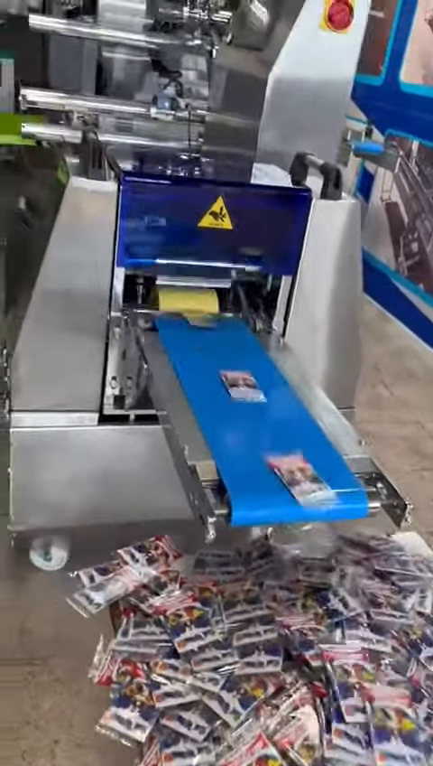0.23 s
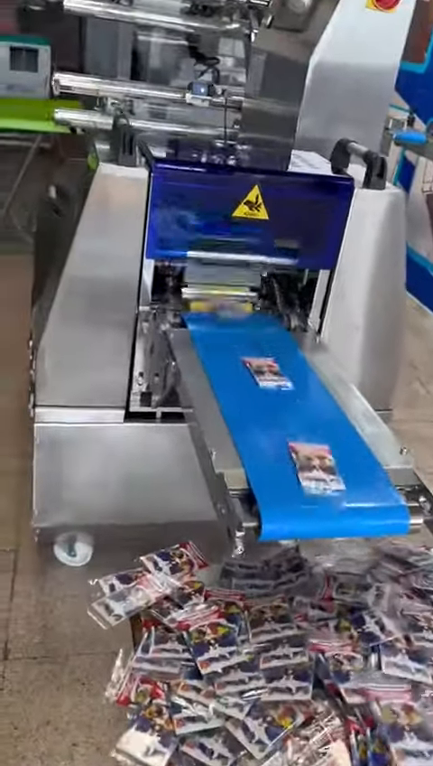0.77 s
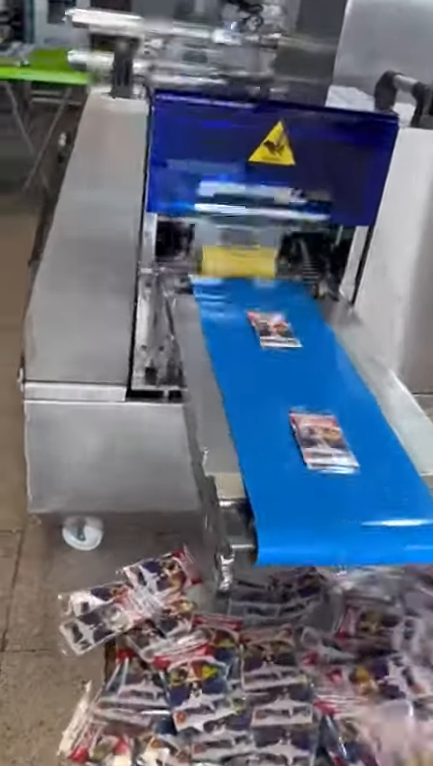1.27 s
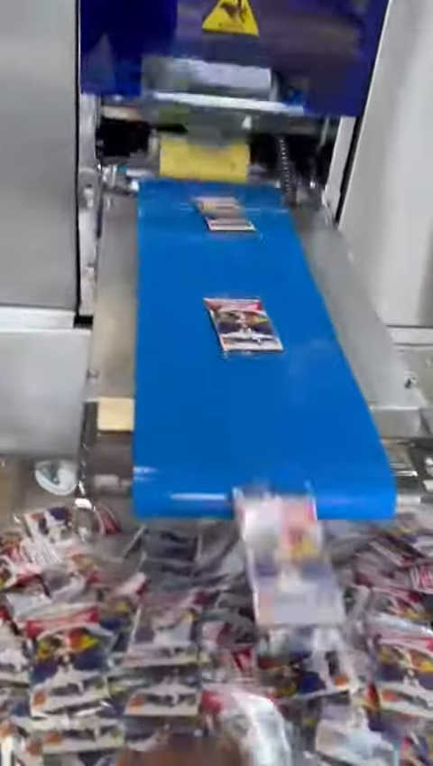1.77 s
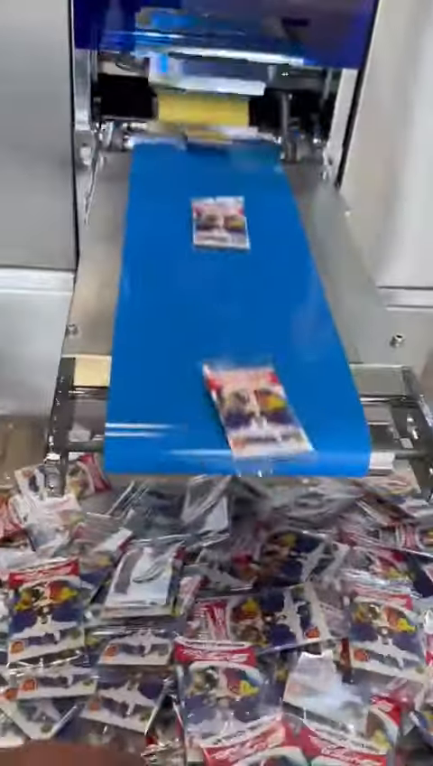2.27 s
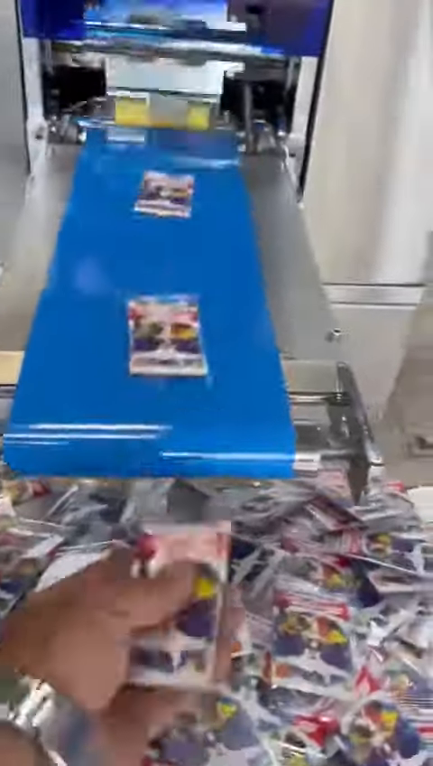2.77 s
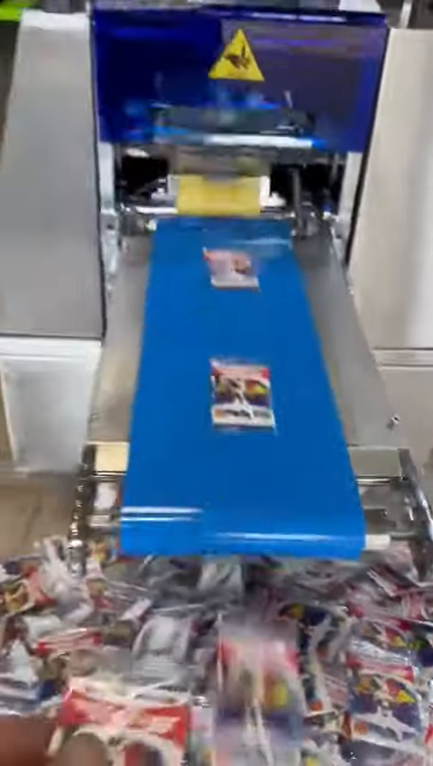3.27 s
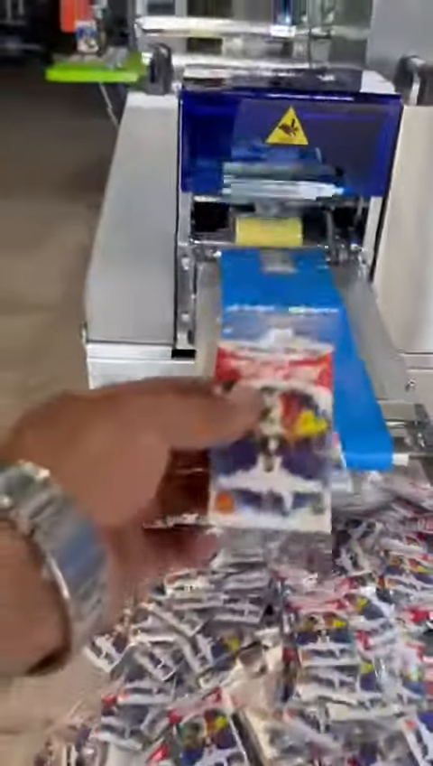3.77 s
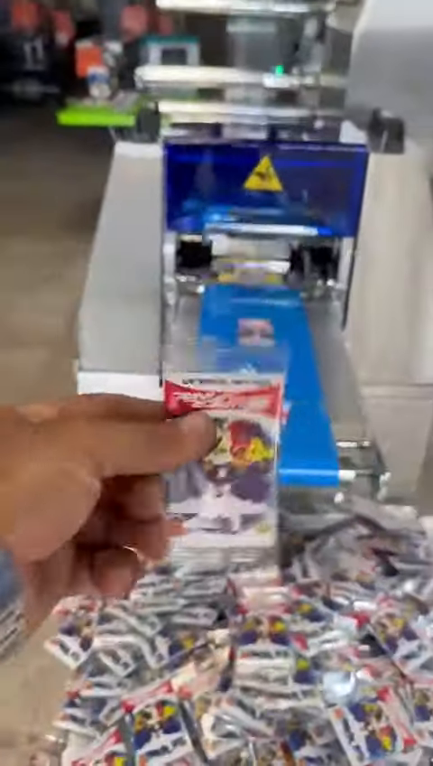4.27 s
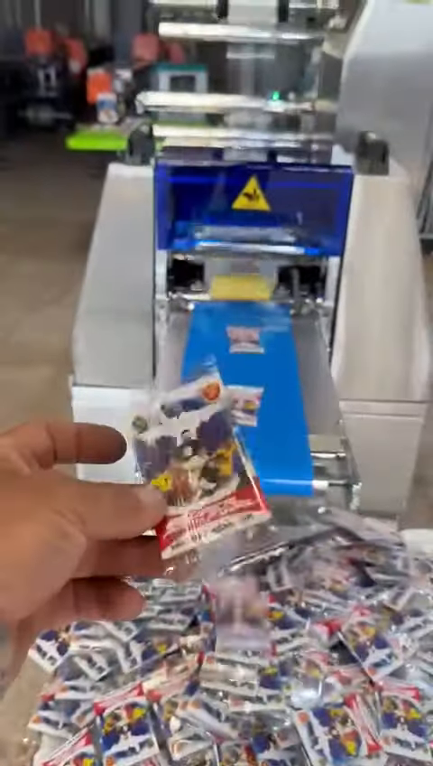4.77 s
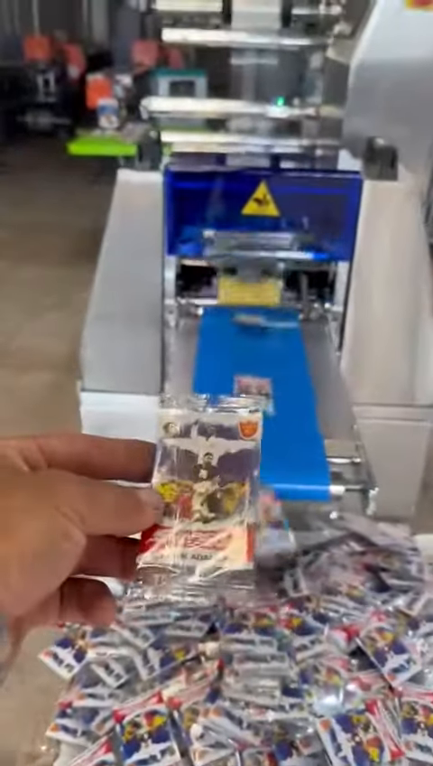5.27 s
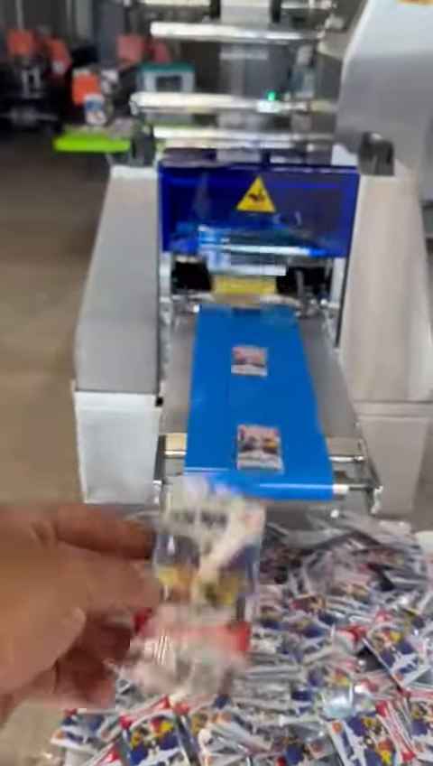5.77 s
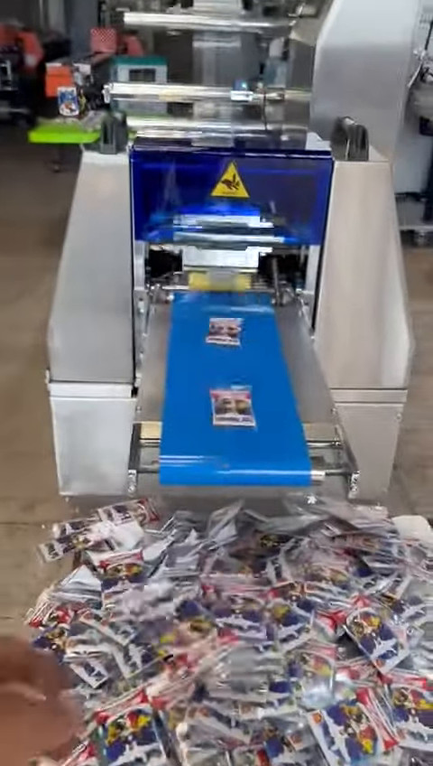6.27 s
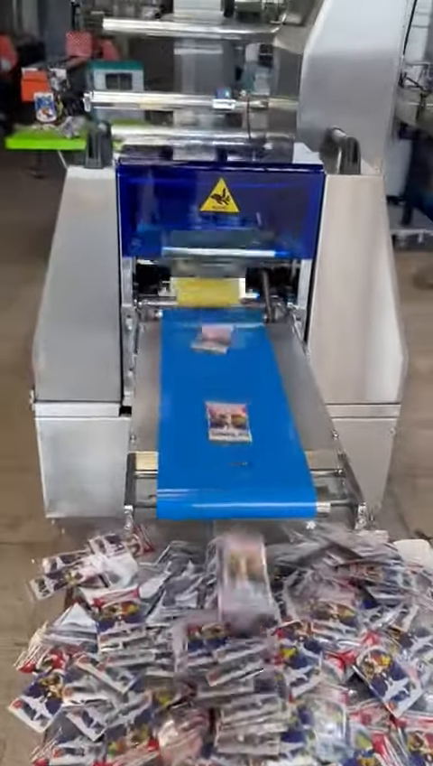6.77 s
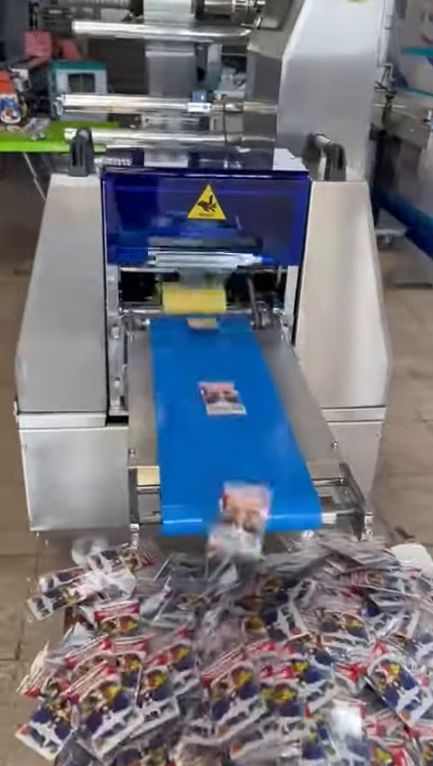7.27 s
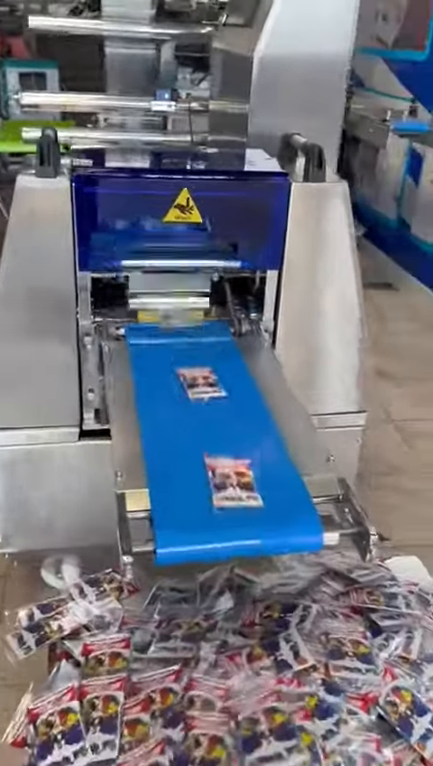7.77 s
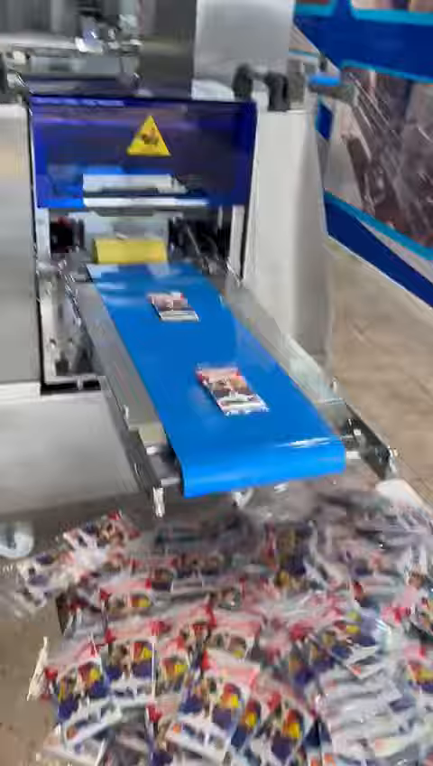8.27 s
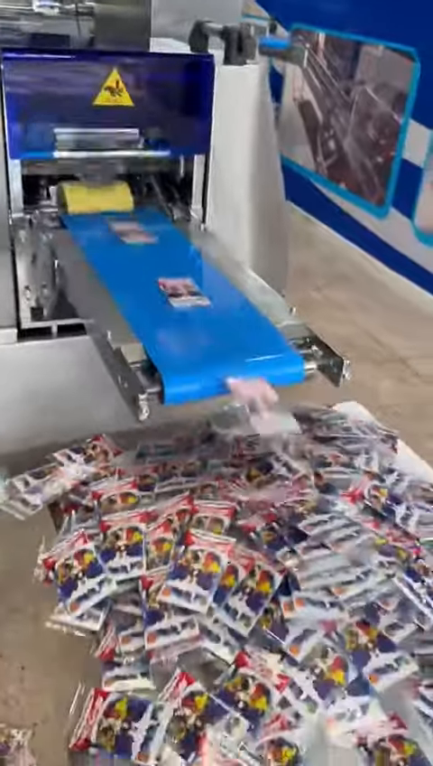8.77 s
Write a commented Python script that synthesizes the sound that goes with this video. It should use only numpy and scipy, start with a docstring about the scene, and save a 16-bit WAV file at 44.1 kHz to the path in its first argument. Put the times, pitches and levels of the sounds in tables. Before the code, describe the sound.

A packaging machine runs with a rhythmic groan, knock and steel clack over a steady hiss, while foil packets crinkle close by.

```python
"""A rhythmic groan, knock and clack over a steady hiss: a flow-wrap packaging machine in a workshop.
In every cycle the drive groans and hums under a changing load, the cams knock, and the sealing jaws
twice snap through the film and clack open. The steel cabinet rumbles; chain, belt and film hiss.
Foil packets drop on a heap and crinkle in a hand. All is heard close up, on a hand-held microphone."""
import sys
import numpy as np
from scipy import signal
from scipy.fft import rfft, irfft, next_fast_len
from scipy.io import wavfile
from scipy.ndimage import uniform_filter1d

SR = 44100
rng = np.random.default_rng(int(sys.argv[2]) if len(sys.argv) > 2 else 0)


def dump_mix(stems):
    """Bounce the given channels to the path in sys.argv[1] as a 16-bit WAV at rate SR."""
    frames = np.atleast_2d(stems).T  # one column per channel
    limited = np.clip(frames, -1, 1)  # hard clip at full scale
    pcm = np.round(limited * 32767).astype(np.int16)
    wavfile.write(sys.argv[1], SR, pcm)


N = 398223
TIME = np.arange(N) / SR
PADDED = next_fast_len(N, real=True)
BINS_HZ = np.fft.rfftfreq(PADDED, 1 / SR)
CYCLE_S = .5835
STROKE_S = CYCLE_S / 2  # the jaws close twice a cycle

# The microphone leans in and out: time_s, nearness_db, handling_rumble_db
MIC_MOVES = [(0, 0, -57.5), (1.2, 0, -55.5), (2, 1.5, -39.5), (2.8, -0.5, -50), (3.5, 0.5, -52),
             (4.4, -0.9, -40), (5.5, -0.5, -50), (6.2, 0, -57.5), (7, 0, -49), (7.8, -0.5, -38),
             (8.4, -1, -44), (9, -.5, -42)]
# The bright colour of crackling film: frequency_hz, level_db
FILM_COLOUR = [(500, -15.5), (2000, -9), (4500, 0), (6300, -1.5), (7400, -2.5), (9000, -5), (9800, -2.5),
               (10500, -20), (12000, -35)]


def amp(db):
    """Decibels to gain."""
    return 10 ** (np.asarray(db) / 20)


def unit_rms(x):
    """Scales x to rms 1."""
    return x / np.sqrt(np.mean(x ** 2) + 1e-20)


def curve_at(points, hz):
    """Reads a curve on a log-frequency axis."""
    points_hz, values = np.transpose(points)
    return np.interp(np.log(hz + 1), np.log(points_hz + 1), values)


def add(mix, start_s, sound):
    """Lays a sound into the mix at start_s."""
    part = mix[..., max(round(start_s * SR), 0):][..., :sound.shape[-1]]
    part += sound[..., :part.shape[-1]]


def filtered(x, gain):
    """Applies one gain to each frequency."""
    return irfft(rfft(x.astype(np.float32), PADDED) * gain.astype(np.float32), PADDED)[..., :N]


def coloured(x, spectrum):
    """Gives x a spectrum, at rms 1."""
    return unit_rms(filtered(x, amp(curve_at(spectrum, BINS_HZ))))


def dappled(x, spectrum, ripple_db, patchy_db):
    """Colours x, at rms 1; reflections off steel sheets ripple it and moving parts shift it in patches."""
    hz, _, frames = signal.stft(x.astype(np.float32), SR, nperseg=2048)
    ripple = unit_rms(uniform_filter1d(rng.standard_normal(len(hz)), size=3))[:, None]
    patches = uniform_filter1d(rng.standard_normal(frames.shape[1:]), size=9, axis=0)
    patches = unit_rms(uniform_filter1d(patches, size=4, axis=1))
    short_waves = np.clip(hz / 900, 0, 1)[:, None] ** 2  # long waves bend round the sheets
    gain = amp(curve_at(spectrum, hz)[:, None] + short_waves * (ripple_db * ripple + patchy_db * patches))
    _, shaped = signal.istft(frames * gain.astype(np.float32), SR, nperseg=2048)
    return unit_rms(shaped[:, :N])


def ringing(x, modes, spread):
    """Rings x through a bank of resonances, each 6 dB down at spread * width from its centre."""
    power = sum((amp(db) * unit_rms(1 / (1 + ((BINS_HZ - hz) / (spread * width)) ** 2))) ** 2
                for hz, width, db in modes)
    return filtered(x, np.sqrt(power))


def resonate(x, hz, width_hz):
    """A steep resonance that can follow a pitch curve, at rms 1."""
    carrier = np.exp(2j * np.pi * np.cumsum(hz * np.ones(N)) / SR)
    pole = np.exp(-np.pi * width_hz / SR)
    baseband = signal.lfilter([(1 - pole) ** 2], [1, -2 * pole, pole * pole], x / carrier)
    return unit_rms((carrier * baseband).real)


def tone(pitch_hz):
    """A sine that follows a pitch curve, at rms 1."""
    return unit_rms(np.sin(2 * np.pi * np.cumsum(pitch_hz) / SR))


def wander(rate_hz):
    """A smooth random drift of rms 1, up to about rate_hz changes a second."""
    t = TIME[::128]
    rolloff = np.exp(-(np.fft.rfftfreq(len(t), t[1]) / rate_hz) ** 2)
    drift = irfft(rfft(rng.standard_normal(len(t))) * rolloff, len(t))
    return np.interp(TIME, t, unit_rms(drift))


def sway(period_s, peak_s):
    """A regular swing between -1 and 1 with a crest at peak_s."""
    return np.cos(2 * np.pi * (TIME - peak_s) / period_s)


def each_cycle(first_s, uneven_db, accents=()):
    """(start_s, extra_db) of a hit that returns each cycle, a little uneven; accents set single ones."""
    starts_s = np.arange(first_s, N / SR, CYCLE_S)
    extra_db = uneven_db * rng.standard_normal(len(starts_s))
    for accent_s, accent_db in accents:
        extra_db[abs(starts_s - accent_s) < .03] = accent_db
    return zip(starts_s, extra_db)


def shaking(repeat):
    """Two channels of random force; a share returns every cycle as the same teeth meet again."""
    cycle = rng.standard_normal((2, round(CYCLE_S * SR)))
    looped = cycle[:, np.arange(N) % cycle.shape[1]]
    return np.sqrt(repeat) * looped + np.sqrt(1 - repeat) * rng.standard_normal((2, N))


def grains(per_s, spread_db=0):
    """Two channels of scattered tiny clicks; spread_db makes their sizes uneven."""
    place, sign, chance = rng.random((round(2 * per_s * N / SR), 3)).T
    size = amp(spread_db * np.minimum(-np.log(1 - chance), 4))
    clicks = np.zeros(2 * N)
    clicks[(place * 2 * N).astype(int)] = np.sign(sign - .5) * size
    return clicks.reshape(2, N)


def bursts(hits, rise_s, t60_s):
    """Envelope of hits (start_s, level_db) with a quick attack and a dying tail."""
    power, t = np.zeros(N), np.arange(SR // 2) / SR
    for start_s, db in hits:
        add(power, start_s, (amp(db - 60 * t / t60_s) * (1 - np.exp(-t / rise_s))) ** 2)
    return np.sqrt(power)


def narrow_swells(swells):
    """Brief narrow bands of noise that fade in and out."""
    out = np.zeros(N)
    for start_s, length_s, hz, width_hz, db in swells:
        size = round(length_s * SR)
        band = 1 / (1 + ((np.fft.rfftfreq(size, 1 / SR) - hz) / (width_hz / 2)) ** 2)
        ring = unit_rms(irfft(rfft(rng.standard_normal(size)) * band, size))
        add(out, start_s, amp(db) * signal.windows.tukey(size, .7) * ring)
    return out


def drive(roughness=.26, waver_hz=6, throb_db=1.6, groan_db=-3, boom_s=.0496):
    """The drive speeds up and slows each cycle; its gear tone groans in the cabinet and booms on load."""
    # The groan through one cycle: cycle_time_s, pitch_hz, level_db
    groan = [(.03, 320.4, -27.5), (.12, 322.6, -28), (.17, 333.7, -29.5), (.23, 332.5, -24),
             (.31, 323.7, -31), (.36, 309.6, -25), (.416, 315, -24), (.445, 318, -34.5),
             (.51, 336.7, -23.5)]
    # Two quick booms a cycle as the drive pulls: cycle_time_s, pitch_hz, level_db
    pulls = [(.482, 339, -24.5), (.547, 328.7, -24.5)]
    # The hardest pulls: centre_s, length_s, pitch_hz, level_db
    hard_pulls = [(0.478, 0.052, 345, -18.5), (0.537, 0.027, 326.5, -24), (0.941, 0.061, 304, -21.5),
                  (1.068, 0.026, 332, -18), (1.121, 0.048, 320.5, -21), (1.166, 0.047, 315, -20),
                  (1.403, 0.042, 325, -23), (1.452, 0.052, 310.3, -22), (1.54, 0.07, 309.8, -20.5),
                  (1.642, 0.044, 337, -22), (1.714, .05, 315, -22), (2.231, 0.023, 327.6, -12.5),
                  (2.285, 0.044, 319.2, -20), (2.818, 0.026, 344, -22.5), (3.097, 0.043, 337, -22.5),
                  (3.391, 0.043, 339.8, -18.5), (3.448, .045, 331, -20.5), (3.922, 0.047, 298.4, -18),
                  (4.033, 0.076, 334.3, -16.5), (4.283, 0.037, 307.2, -22.5), (4.634, 0.032, 327.8, -18),
                  (5.155, 0.052, 334, -17.5), (5.228, 0.04, 319.4, -17.5), (5.745, 0.11, 338, -16.5),
                  (5.809, 0.036, 334, -17.5), (6.329, 0.071, 332.7, -19), (6.396, 0.065, 327.7, -16.5),
                  (6.82, 0.033, 298.5, -20), (7.5, 0.068, 325, -21), (7.543, 0.054, 320, -20)]
    times_s, pitches_hz, levels_db = np.transpose(groan)
    pitch = np.interp(TIME, times_s, pitches_hz, period=CYCLE_S)
    level = amp(groan_db + np.interp(TIME, times_s, levels_db, period=CYCLE_S) + throb_db * wander(25))
    noise_share = np.full(N, roughness)
    regular_pulls = [(centre_s, boom_s, hz, db + extra_db) for first_s, hz, db in pulls
                     for centre_s, extra_db in each_cycle(first_s, uneven_db=1)]
    for centre_s, length_s, peak_hz, peak_db in regular_pulls + hard_pulls:
        pull = np.hanning(round(length_s * SR))
        span = round((centre_s - length_s / 2) * SR) + np.arange(len(pull))
        level[span] += pull * (amp(peak_db) - level[span])
        pitch[span] += pull * (peak_hz - pitch[span])
        noise_share[span] *= 1 - pull  # a pull rings clean
    pitch += waver_hz * wander(8.57)
    growl = resonate(rng.standard_normal(N), pitch, width_hz=45)
    return level * (np.sqrt(1 - noise_share) * tone(pitch) + np.sqrt(noise_share) * growl)


def motor(hum_hz=102.2, swing_hz=2.1, waver_hz=3.27, hum_db=-1, throb_db=1.5, uneven_db=.4):
    """A low hum surges, throbs four times a cycle and bends with each stroke, over faint gear tones."""
    # The surges of the hum: time_s, level_db
    surges = [(0.0, -31), (0.05, -36), (0.1, -26.5), (0.3, -33), (0.35, -39), (0.58, -28.5), (0.63, -39),
              (0.98, -26), (1.11, -38), (1.16, -27), (1.28, -42), (1.33, -31.5), (1.41, -42), (1.56, -29),
              (1.78, -42.5), (1.83, -27), (1.94, -35), (2.46, -32.5), (2.51, -42.5), (2.62, -26),
              (2.81, -40), (2.89, -29.5), (3.12, -42), (3.19, -35), (3.37, -29), (3.42, -35), (3.87, -29),
              (4.0, -42.5), (4.05, -34), (4.45, -32), (4.65, -26.5), (4.73, -40), (4.78, -27.5),
              (4.98, -32.5), (5.33, -31.5), (5.38, -25.5), (5.46, -36.5), (5.53, -24.5), (5.61, -49),
              (5.68, -30.5), (5.76, -41.5), (5.83, -26.5), (5.91, -39.5), (6.11, -26), (6.24, -37),
              (6.44, -24.5), (6.51, -44), (6.54, -29), (6.66, -38.5), (6.71, -25), (6.79, -40), (6.84, -35),
              (6.92, -44.5), (6.96, -28.5), (7.67, -32), (7.69, -27), (8.1, -37.5), (8.15, -25.5),
              (8.22, -37), (9.03, -32)]
    # Faint steady gear tones: pitch_hz, level_db
    gear_tones = [(50.5, -50.5), (68.5, -52.5), (170, -41), (233, -45.5), (258.5, -43), (7154, -61)]
    pitch = hum_hz + swing_hz * sway(STROKE_S, peak_s=0) + waver_hz * wander(12.4)
    load_db = np.interp(TIME, *np.transpose(surges)) + throb_db * sway(CYCLE_S / 4, peak_s=.278)
    hum = amp(hum_db + load_db + uneven_db * wander(7.8)) * tone(pitch)
    shaft_s = np.cumsum(1 + .004 * wander(3.6)) / SR  # all gears drift together
    gears = sum(amp(db) * unit_rms(np.sin(2 * np.pi * (hz * shaft_s + rng.random())))
                for hz, db in gear_tones)
    return hum + gears


def cabinet(rumble_db=-28, load_db=1):
    """Chain and gears shake the frame and its panels, harder as the jaws close."""
    # Resonances of the steel cabinet and guards: pitch_hz, nominal_width_hz, level_db
    panel_modes = [(153, 9.4, -37), (177.6, 10, -37), (196.4, 14, -37), (234, 24, -31.5), (257, 24, -36),
                   (302, 16, -32), (353, 62, -32.5), (483, 79, -38.5), (705, 25, -40), (809, 30, -44),
                   (920, 30, -46), (1200, 66, -51), (1833, 120, -45), (2260, 100, -44.5),
                   (2490, 170, -43.5), (2705, 80, -44.5), (2916, 53, -48.5), (3197, 29, -49.5),
                   (3360, 50, -51), (5600, 150, -52)]
    # The dark colour of the shaking frame: frequency_hz, level_db
    rumble_colour = [(20, -40.5), (36, -26), (50, -7.5), (64, -10), (85, -4.5), (125, -2.5), (200, -6.5),
                     (340, -11), (430, -6), (620, -7.5), (1000, -13.5), (1600, -21.5), (4000, -60)]
    panels = ringing(shaking(repeat=.3), panel_modes, spread=.73)
    frame = dappled(shaking(repeat=.25), rumble_colour, ripple_db=2, patchy_db=2)
    times_s, nearness_db, _ = np.transpose(MIC_MOVES)
    level = amp(np.interp(TIME, times_s, nearness_db) + load_db * sway(STROKE_S, peak_s=.25))
    return level * (panels + amp(rumble_db) * frame)


def conveyor(hiss_db=-31, rattle_db=-39, flicker_db=.55, swell_db=1, load_db=.2):
    """Film and belt slide with a hiss that lifts slightly at each stroke; chain links tick through it."""
    # The colour of belt, film and chain: frequency_hz, level_db
    hiss_colour = [(200, -20.5), (600, -13), (1100, -1.5), (1550, -3.5), (2000, -1.5), (2650, -2),
                   (3150, -3), (4200, -5), (5300, -9), (6400, -8), (8500, -14.5), (9700, -23), (10300, -40),
                   (11000, -45)]
    slide = dappled(shaking(repeat=.1), hiss_colour, ripple_db=.7, patchy_db=1.8)
    links = coloured(grains(per_s=900), hiss_colour)
    level = amp(load_db * sway(STROKE_S, peak_s=.2) + flicker_db * wander(31) + swell_db * wander(2.1))
    return level * (amp(hiss_db) * slide + amp(rattle_db) * links)


def cams(uneven_db=1.5, slack_s=.001184, rise_periods=.55, knock_db=.5,
         thump_hz=255, thump_db=-19, thump_t60_s=.17):
    """Cams knock and the jaws thump each cycle, never quite equally hard; some strokes add a dull chug."""
    # Cams and links that strike in every cycle: cycle_time_s, pitch_hz, level_db, t60_s
    knocks = [(.011, 269, -22, 0.066), (0.045, 254, -17.5, 0.089), (.083, 316, -11, 0.038),
              (0.137, 1880, -23.5, 0.037), (.152, 240, -18, .035), (0.158, 1215, -24.5, 0.038),
              (.175, 2076, -26, 0.037), (.179, 587, -21, 0.061), (0.184, 385, -11.5, 0.036),
              (.187, 915, -19, 0.026), (.233, 239, -17.5, 0.15), (.276, 118, -21.5, 0.051),
              (.278, 166, -18.5, .06), (0.451, 1870, -28.5, 0.028), (0.47, 1681, -17, 0.0096),
              (0.477, 395.4, -20, 0.11), (.5, 457, -26, 0.082), (.564, 118, -30, 0.031),
              (.565, 183, -22.5, 0.072)]
    # The heavy thumps of the jaws meeting: start_s, extra_db
    heavy_thumps = [(.776, 5), (1.947, 6.5), (2.535, 5), (3.114, 4.1), (3.698, 8.3), (4.865, 7.3),
                    (6.615, 6.9), (7.782, 6), (8.365, 8.8)]
    # Dull chugs on some jaw strokes, and a few low thuds: start_s, pitch_hz, level_db, t60_s
    chugs_and_thuds = [(.484, 181, -16.5, .15), (.484, 381, -15, .09), (.806, 231, -15, 0.18),
                       (1.07, 184, -18, .1), (1.245, 245, -19.5, 0.11), (1.642, 386, -13, .09),
                       (2.606, 165, -15.5, .12), (2.806, 390, -14, .09), (3.1, 370, -13, .05),
                       (3.988, 385, -18.5, .09), (4.262, 380, -16, .09), (4.572, 392, -19, .09),
                       (4.838, 383, -19, .08), (6.012, 390, -16, .09), (6.075, 242, -16.5, 0.14),
                       (8.677, 181, -12.5, .15)]
    hits = [(start_s, hz, knock_db + db + extra_db, t60_s) for first_s, hz, db, t60_s in knocks
            for start_s, extra_db in each_cycle(first_s, uneven_db)]
    thumps = [(start_s, thump_hz, thump_db + extra_db, thump_t60_s)
              for start_s, extra_db in each_cycle(.18, uneven_db, accents=heavy_thumps)]
    out, t = np.zeros(N), np.arange(SR // 4) / SR
    for start_s, hz, db, t60_s in hits + thumps + chugs_and_thuds:
        late, detune = rng.standard_normal(2)
        ring = np.sin(2 * np.pi * hz * (1 + .012 * detune) * t)
        attack = (1 - np.exp(-t * hz / rise_periods)) ** 2
        add(out, start_s + slack_s * late, ring * attack * amp(db - 60 * t / t60_s))
    return out


def jaws(open_after_s=.0806, clack_db=-1.2, ring_db=.5, flutter_db=1):
    """The knife parts the film with a gritty snap; the steel jaws open with a clack that rings on."""
    # The strokes of the jaws: start_s, snap_db, opening_clack_db
    strokes = [(.2, -30, -25.5), (.494, -30.5, -28.5), (0.78, -36, -26), (1.073, -33.5, -25),
               (1.367, -30, -25), (1.654, -30.5, -30), (1.947, -31, -24.5), (2.24, -32, -22),
               (2.532, -34, -24.5), (2.82, -29, -24), (3.116, -29.5, -26.5), (3.41, -32, -44),
               (3.701, -35.5, -23.5), (3.989, -34.5, -22), (4.286, -28.5, -22.5), (4.576, -27.5, -30),
               (4.865, -30.5, -24), (5.157, -34.5, -31), (5.45, -33, -24), (5.742, -33, -27.5),
               (6.03, -26.5, -24), (6.326, -29.5, -25.5), (6.613, -30, -25.5), (6.907, -32.5, -28),
               (7.201, -29.5, -25.5), (7.486, -30.5, -21.5), (7.782, -28, -21.5), (8.072, -30, -25.5),
               (8.367, -31, -23.5), (8.657, -33, -33), (8.952, -33.5, -27)]
    # Short hard clacks as the jaws hit their stop: start_s, level_db
    stop_hits = [(.036, -21), (.592, -24), (.877, -25), (2.327, -25), (4.098, -21), (6.121, -23.5),
                 (6.432, -24.5), (6.703, -25.5), (7.578, -23.5), (7.867, -23), (8.163, -24)]
    # The colour of the clack's rasp: frequency_hz, level_db
    rasp_colour = [(150, -19), (500, 4), (1000, -1), (1600, -3), (2300, 3), (3200, -1.5), (4400, -5.5),
                   (5700, -3.5), (7000, -31), (10000, -40)]
    # Resonances of the steel jaws: pitch_hz, nominal_width_hz, level_db
    jaw_modes = [(495, 110, -10), (816, 28, -10.5), (1118, 27, -15), (1888, 60, -13), (2270, 110, -15),
                 (2662, 81, -11), (3710, 45, -14.5)]
    starts_s, snaps_db, clacks_db = np.transpose(strokes)
    snaps = bursts(zip(starts_s, snaps_db), rise_s=.003, t60_s=.26)
    openings = bursts(zip(starts_s + open_after_s, clack_db + clacks_db), rise_s=.0061, t60_s=.52)
    clacks = np.hypot(openings, bursts(stop_hits, rise_s=.0015, t60_s=.064))
    grit = coloured(grains(per_s=3000), FILM_COLOUR)
    rasp = dappled(rng.standard_normal((2, N)), rasp_colour, ripple_db=1.5, patchy_db=.5)
    ring = ringing(rng.standard_normal((2, N)), jaw_modes, spread=.47)
    return grit * snaps + (rasp * amp(flutter_db * wander(110)) + amp(ring_db) * ring) * clacks


def steel_rings():
    """Steel parts sing out briefly, each on one narrow resonance."""
    # The singing steel: start_s, length_s, pitch_hz, width_hz, level_db
    rings = [(.46, .24, 2615, 16, -35), (1.3, .16, 2760, 40, -43.5), (5.95, .2, 2560, 60, -38),
             (6.41, .1, 1867, 30.1, -38.5), (6.62, 0.2, 2670, 49.8, -37.5), (6.69, 0.09, 1900, 30, -38),
             (7.55, 0.12, 2700, 40, -37.5)]
    return narrow_swells(rings)


def packets(crack_db=-2, clump_db=4, running_film_db=-47):
    """Foil packets crinkle in clumps of tiny clicks over the faint running film; cracks cut through."""
    # Packets land, slide and are handled: start_s, length_s, level_db
    rustles = [(1.322, 0.13, -42.5), (1.85, 0.098, -40), (2.42, .2, -46.5), (2.668, 0.36, -39),
               (3.19, 0.097, -51), (3.76, 0.053, -39.5), (4.094, .15, -36.5), (5.13, 0.073, -45),
               (5.243, 0.13, -50), (6.022, 0.14, -45.5), (7.19, 0.12, -40.5), (8.2, 0.078, -49),
               (8.458, 0.27, -48.5)]
    # Sharp bright cracks, many as the jaws snap through the film: start_s, level_db, t60_s
    cracks = [(1.368, -32, .03), (1.905, -26, .03), (3.777, -30.5, .025), (4.08, -34, .03),
              (4.153, -22, .018), (4.196, -26, .016), (4.38, -33, .03), (4.583, -26, .06),
              (5.156, -30.5, .03), (5.468, -30.5, .03), (5.743, -28, .04), (6.036, -28, .035),
              (6.5, -29.5, .02), (6.64, -29, .05), (7.203, -27, .04), (7.787, -33, .06), (8.062, -21, .03),
              (8.08, -30, .05), (8.368, -28.5, .07), (8.575, -32.5, .02)]
    # The colour of the cracks: frequency_hz, level_db
    crack_colour = [(500, -24), (2500, -4), (5000, 1), (6500, 1.5), (9000, 1.5), (10500, -6), (11500, -16)]
    touch = np.full(N, amp(running_film_db))
    for start_s, length_s, db in rustles:
        add(touch, start_s, amp(db) * signal.windows.tukey(round(length_s * SR), .6))
    folds = dappled(grains(per_s=800, spread_db=2.5), FILM_COLOUR, ripple_db=0, patchy_db=3)
    clumps = unit_rms(amp(clump_db * wander(45)))
    crack_level = sum(bursts([(start_s, db)], rise_s=.001, t60_s=t60_s) for start_s, db, t60_s in cracks)
    grit = coloured(grains(per_s=6500, spread_db=1.5), crack_colour)
    return touch * clumps * folds + amp(crack_db) * crack_level * grit


def film_zings():
    """Sliding film gives off thin, high zings."""
    # The zings of the film: start_s, length_s, pitch_hz, width_hz, level_db
    zings = [(1.35, .1, 7200, 200, -43), (4.57, 0.099, 7160, 150, -44), (4.85, 0.098, 7150, 150, -45.5),
             (5.142, 0.13, 7020, 350, -42), (5.43, 0.087, 7050, 350, -42.5), (5.558, .1, 7300, 350, -49),
             (6.04, 0.26, 5637, 129, -41), (6.108, .14, 6060, 89.7, -46), (6.61, .1, 7220, 151, -43),
             (7.198, 0.12, 7260, 350, -45), (7.78, .09, 7183, 120, -44.5), (8.06, .09, 7200, 150, -49),
             (8.9, 0.11, 7160, 100, -44)]
    return narrow_swells(zings)


def handling():
    """A faint deep rumble swells as the microphone moves in the hand."""
    times_s, _, rumble_db = np.transpose(MIC_MOVES)
    return amp(np.interp(TIME, times_s, rumble_db)) * resonate(rng.standard_normal(N), hz=52, width_hz=18)


def scene(mono_below_hz=130, nearness_share=.6):
    """Cabinet, jaws, conveyor and packets spread in stereo; tones, knocks and handling sit dead centre."""
    # How alike the two microphone ports sound: frequency_hz, correlation (clipped to -1..1)
    port_likeness = [(100, .9995), (300, 1), (720, 0.89), (1150, 0.9), (1600, 1), (2000, .985),
                     (2600, 0.86), (3100, 0.49), (3950, 0.2), (4950, -0.8), (5400, -0.22), (5950, 1),
                     (6900, 1), (7400, 1), (8500, 0.52), (10200, -1.03)]
    shared, apart = cabinet() + jaws() + conveyor() + packets()
    short_waves = np.minimum(BINS_HZ / mono_below_hz, 1) ** 4  # long waves reach both ports alike
    likeness = 1 - (1 - np.clip(curve_at(port_likeness, BINS_HZ), -1, 1)) * short_waves
    times_s, nearness_db, _ = np.transpose(MIC_MOVES)
    nearness = amp(nearness_share * np.interp(TIME, times_s, nearness_db))
    centre = nearness * (drive() + cams()) + motor() + film_zings() + steel_rings() + handling()
    mid = filtered(shared, np.sqrt((1 + likeness) / 2)) + centre
    side = filtered(apart, np.sqrt((1 - likeness) / 2))
    return np.array([mid + side, mid - side])


def record(dry, low_cut_hz=40, high_cut_hz=11200):
    """The low mids lean slightly left; deep bass is trimmed and the sound ends near 11 kHz."""
    # The balance of the two ports: frequency_hz, left_minus_right_db
    lean = [(100, 0), (190, .6), (600, 1), (1060, -.5), (3400, 0)]
    balance = amp(np.outer([.5, -.5], curve_at(lean, BINS_HZ)))
    low_cut = 1 / np.sqrt(1 + (low_cut_hz / (BINS_HZ + 1)) ** 8)
    high_cut = signal.firwin(127, high_cut_hz, window=("kaiser", 9), fs=SR)
    return signal.oaconvolve(filtered(dry, low_cut * balance), high_cut[None], "same")


dry = scene()
out = record(dry)
dump_mix(out)
```